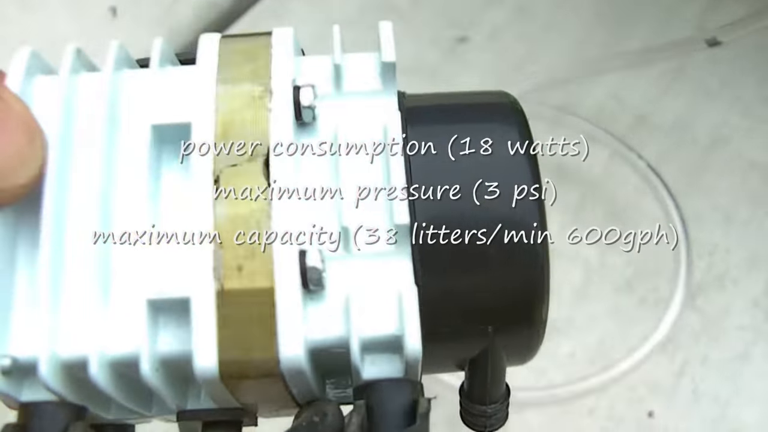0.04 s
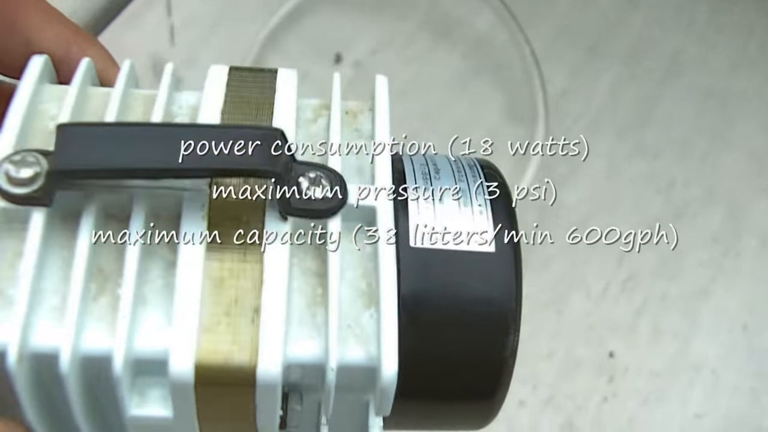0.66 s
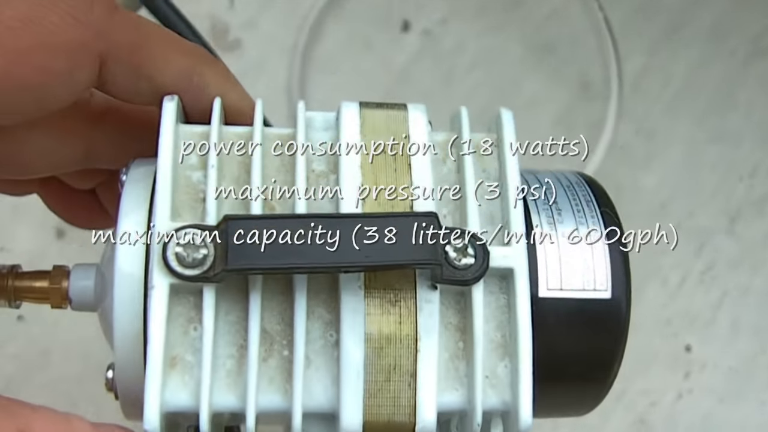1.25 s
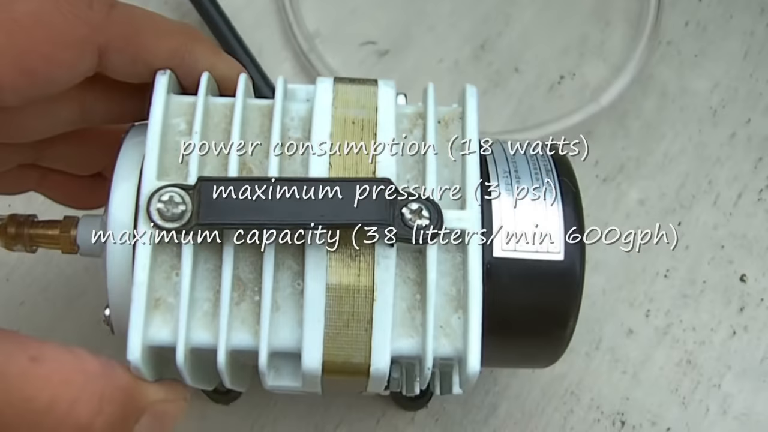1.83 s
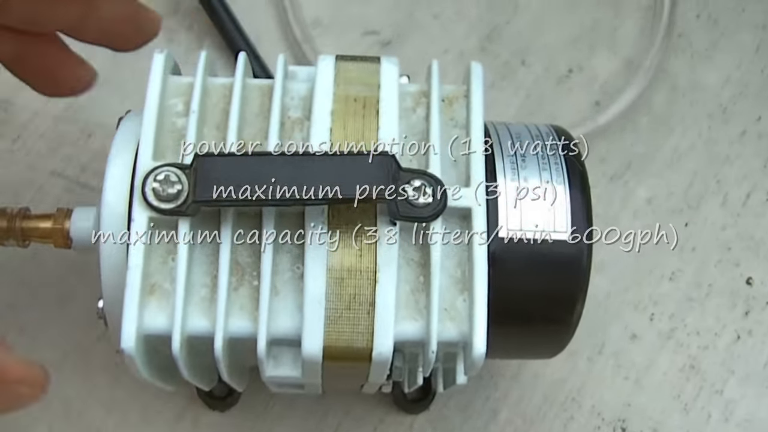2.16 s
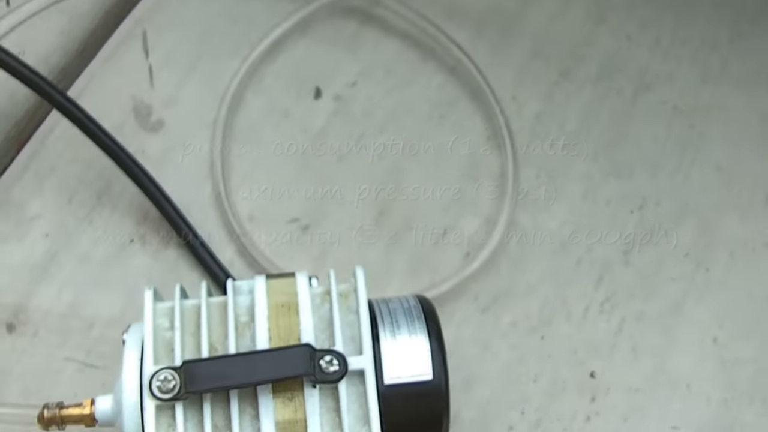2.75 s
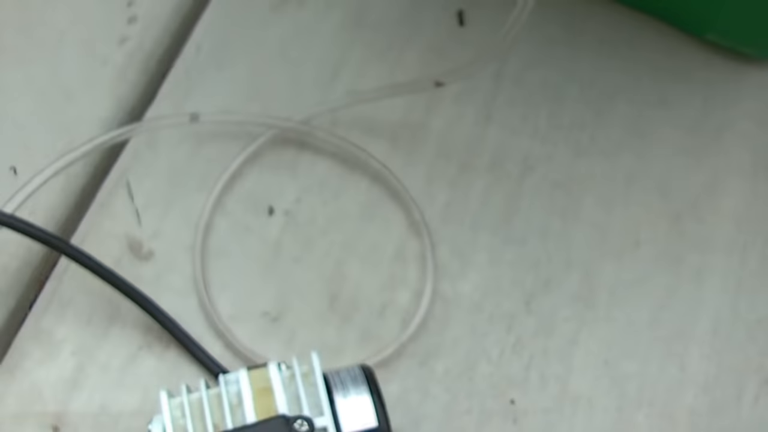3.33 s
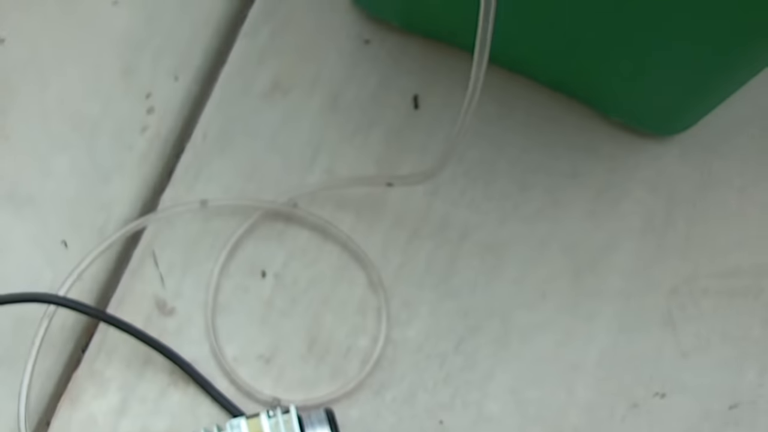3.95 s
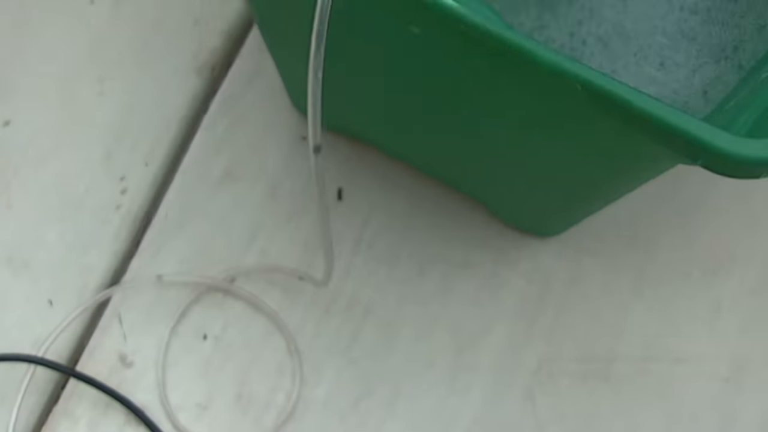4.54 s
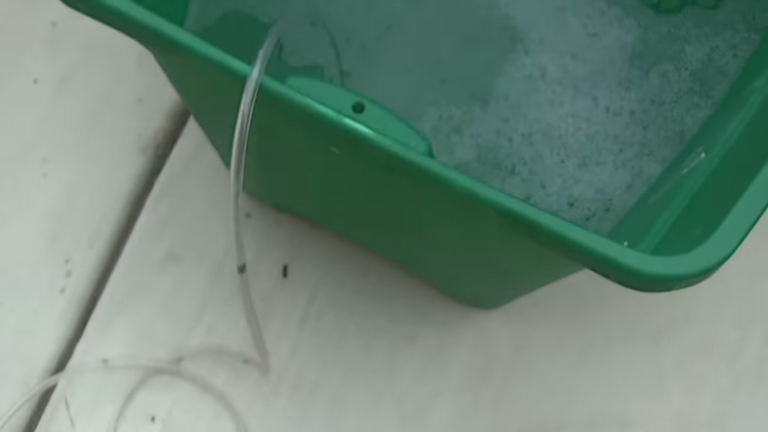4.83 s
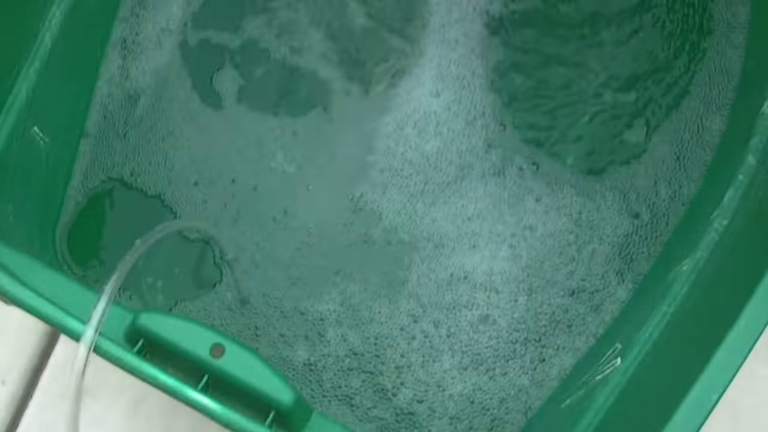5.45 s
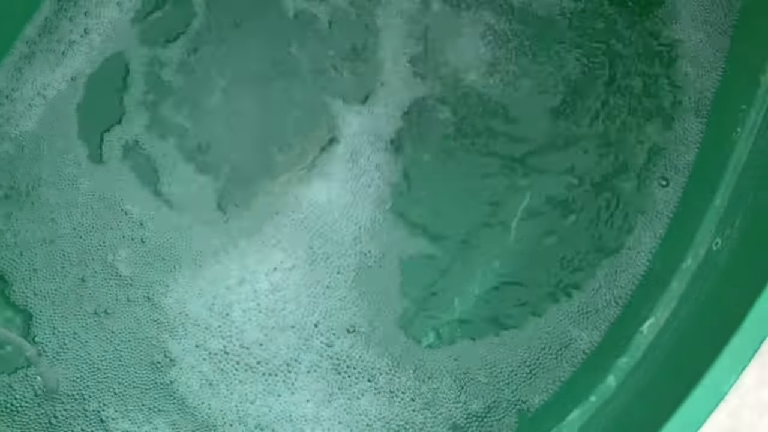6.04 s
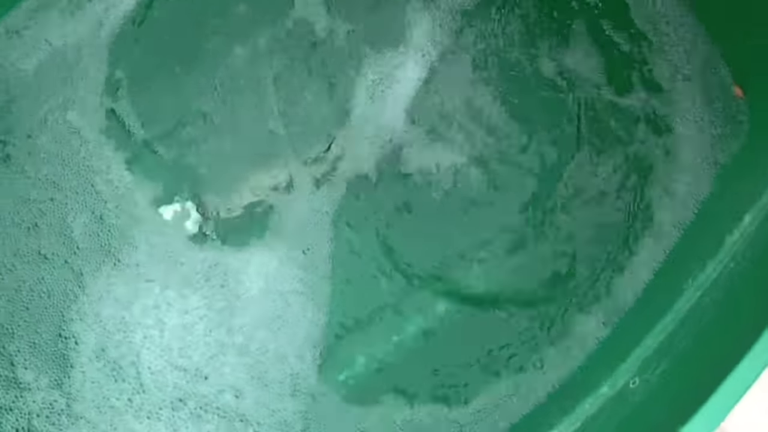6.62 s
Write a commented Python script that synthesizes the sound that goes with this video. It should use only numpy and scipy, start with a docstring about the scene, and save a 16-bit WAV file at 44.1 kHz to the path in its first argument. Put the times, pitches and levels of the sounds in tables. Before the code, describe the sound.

The rapid metallic buzz of a small electric air pump fades into the distance as clicks and scuffs sound on the microphone.

```python
"""First you hear a small air pump buzzing and rattling on a hard floor as it feeds a tub of foaming water.
Its electromagnet shakes it 60 times a second. The piston and valves strike four times in each cycle
and ring the finned casing, and air hisses with each stroke. A hand rolls the pump upright and sets
it down. Then the microphone drifts to the tub and the buzz fades: the grip on the microphone's shell
clicks and scuffs, and the water gives a few small blips."""
import sys
import numpy as np
from scipy import signal
from scipy.fft import rfft, irfft, next_fast_len
from scipy.io import wavfile
from scipy.ndimage import uniform_filter1d

SR = 44100
rng = np.random.default_rng(int(sys.argv[2]) if len(sys.argv) > 2 else 0)


def wav_record(signal):
    """Record a signal, one row per channel, as 16-bit PCM in the file named by sys.argv[1]."""
    frames = np.transpose(np.atleast_2d(signal))
    bounded = np.clip(frames, -1, 1)
    # unit amplitude maps onto the largest positive 16-bit level
    quanta = np.round(bounded * 32767).astype(np.int16)
    wavfile.write(sys.argv[1], SR, quanta)


N = 295029
TIME_S = np.arange(N) / SR
FFT_SIZE = next_fast_len(N + 8192)
FFT_HZ = np.arange(FFT_SIZE // 2 + 1) * SR / FFT_SIZE + 1e-6
MAINS_HZ, SOUND_M_PER_S = 60, 343

# How far the microphone is from the pump: time_s, distance_m
PUMP_DISTANCE = [(0, 0.24), (.8, 0.17), (2, 0.25), (2.6, 0.31), (3.4, 0.56), (4.2, .74), (4.85, 1.12),
                 (6.7, 1.45)]
# Angle between the pump's top and the microphone as the hand rolls it upright: time_s, tilt_degrees
PUMP_TILT = [(0, 57), (.17, 70), (.48, 66), (.75, 51), (1.1, 17), (1.5, 5)]

# Tone colour of each noise, and of the clicking shell: pitch_hz, relative_db
ROOM_COLOUR = [(25, -39), (60, -28), (120, -38), (250, -13), (550, -2), (1000, -1), (2300, -1), (4500, -7),
               (9000, -8), (12000, -11), (15500, -15.5)]
RUMBLE_COLOUR = [(25, -57), (50, -0.5), (95, 0), (200, -3.5), (330, 0), (500, -2), (700, -4), (950, -38),
                 (2000, -60)]
SCUFF_COLOUR = [(300, -45), (750, -7), (1200, 1.5), (1900, 5.5), (3000, -4), (5500, 1.5), (7800, -1),
                (10000, 0.5), (12500, -4.5), (15500, -8)]
AIR_COLOUR = [(700, -41), (1500, -25), (2100, -5.5), (3200, -8.5), (4700, -12), (5600, -12.5),
              (6500, -14.5), (9000, -12.5), (12000, -20), (15500, -29)]
SHELL_COLOUR = [(150, -59), (600, -32), (1300, 6.5), (2200, 7.5), (4000, 0.5), (6000, 1), (8000, 2),
                (11000, -3), (15500, -3)]
# Hiss of the room and foam, which dips and then grows toward the tub: time_s, level_db
HISS_LEVEL = [(0, -56), (3.4, -58.5), (4.3, -57), (6.7, -56.5)]
# Bubbles and hollow knocks: start_s, pitch_hz, fade_by_60_db_s, level_db
BLIPS = [(3.846, 1010, 0.02, -35.5), (3.8548, 330, 0.02, -42), (3.8543, 620, 0.012, -34),
         (4.967, 704, 0.022, -39), (5.024, 757, 0.028, -42), (5.027, 1100, 0.016, -37.5),
         (5.3, 1385, .05, -47)]
# Clicks of the shell in the hand: start_s, level_db, brightest_hz, width_octaves, left_minus_right_db
GRIP_CLICKS = [(3.155, -35, 3500, 1.8, 1), (3.702, -32, 2350, 1.1, 0), (3.758, -26.5, 7500, 1.4, -1),
               (3.844, -42.5, 2420, 0.5, -30), (3.8542, -25.5, 4800, 0.78, -4),
               (4.043, -24.5, 13000, 0.76, -2), (4.34, -36.5, 6000, 1, 0), (4.5881, -31, 3120, 1.24, -11.5),
               (5.728, -25, 9100, 1.6, -6), (5.761, -21.5, 10100, 0.74, -8), (5.774, -24, 10000, 1.3, -1),
               (5.818, -31, 4500, 1.4, -2), (5.843, -28, 4500, 1.2, -3), (5.846, -24, 3770, 0.79, 0),
               (5.886, -15.5, 9600, 1.13, -1), (6.196, -31, 12000, 0.75, -3),
               (6.2045, -17, 6500, 2.2, -0.5), (6.249, -29.5, 8900, 0.75, -1),
               (6.493, -29.5, 8800, 1.05, 2)]
# Swells of hand rumble, dragging skin and loose pump casing: middle_s, half_length_s, level_db
GRIP_RUMBLES = [(1.95, 0.57, -63.5), (3.92, 0.23, -63.5)]
GRIP_SCUFFS = [(3.924, 0.022, -51), (4.626, 0.021, -55), (5.288, 0.02, -55), (5.734, 0.01, -39.5),
               (5.766, 0.013, -38.5), (5.822, 0.032, -44.5), (5.851, 0.0069, -43), (6.646, 0.013, -50)]
CASING_CHATTERS = [(.01, .03, -55), (.72, 0.18, -48.5), (1.999, .003, -44.5), (2.032, .003, -45),
                   (2.049, .003, -46), (2.149, .004, -53), (2.183, .004, -47), (2.199, .004, -54),
                   (3.95, 0.043, -59)]

# Tones in the hum, beside the pump and over the tub: multiple_of_mains, relative_db
HUM_NEAR = [(1, -9.5), (2, -2.5), (3, 0.5), (4, -1.5), (5, -5), (6, -7.5), (7, -9.5), (8, -3), (9, -1.5),
            (10, -3), (11, -6.5), (12, -6), (13, -10), (14, -16)]
HUM_FAR = [(1, -24), (2, 0.5), (3, -11), (4, 0.5), (5, 2.5), (6, 0), (7, -4), (8, -10), (9, -2), (10, -6.5),
           (11, -9.5), (12, -7), (13, -15), (14, -11)]
# Higher hum tones that stand out for a while: multiple_of_mains, middle_s, half_length_s, level_db
HUM_OVERTONES = [(13, 0.1, 0.6, -68), (15, 2.2, 0.6, -67), (16, 0.8, 0.8, -72), (19, 1.9, 1.1, -71),
                 (20, 2.1, 0.4, -72), (24, 2.4, 0.5, -69)]

# The four strikes in a cycle and how hard each pushes four parts of the pump:
# time_in_cycle_s, cap_push_db, body_push_db, plate_push_db, tick_push_db
STRIKES = [(.01502, -1, 0, -7, -6), (.00060, -10, -10, -5, -2), (.00200, -12, -7, -12, -9),
           (.00347, -1, -8, 0, 0)]
# How hard the same four strikes push the loose casing: push_db
CASING_PUSH = [22, -36, -29, -24]
# The notes each part rings at when struck (its resonances): pitch_hz, width_hz, relative_db
CASING_NOTES = [(1930, 540, 1.5), (3330, 220, 10.5), (3800, 190, 12), (7200, 1400, 7)]
END_CAP_NOTES = [(1141, 6, 6), (1324, 74, 6), (1513, 175, 14), (1750, 60, 10.5)]
BODY_LOW_NOTES = [(2004, 246, -1), (2090, 84, -2.5), (2220, 125, 4.5)]
BODY_MID_NOTES = [(2392, 40, 7), (2550, 123, 3), (2687, 140, 5), (2806, 117, 0.5)]
BODY_HIGH_NOTES = [(3120, 360, 13.5), (3360, 110, 9), (3580, 72, 4.5), (3720, 91, -2), (3790, 47, 4.5),
                   (4435, 54, 2)]
FIN_NOTES = [(4020, 110, 2), (4324, 160, 5.5), (4680, 260, -6.5), (5054, 61, 6.5)]
VALVE_PLATE_NOTES = [(5180, 130, 0), (5500, 130, 3), (5590, 110, -4)]
VALVE_SEAT_NOTES = [(6480, 220, -1.1), (6950, 130, -1), (7330, 150, -0.33), (7720, 390, 0.51)]
VALVE_TICK_NOTES = [(8300, 200, -3), (8630, 200, 4), (8915, 510, 0), (9380, 320, 5.5), (9700, 380, -19.5),
                    (10700, 950, -2)]
# How loud each part is as the pump turns and is left behind: time_s, level_db
BODY_LOW_LEVEL = [(0, -51.5), (.3, -52), (.67, -44), (1, -48.5), (1.2, -48), (1.45, -47), (1.62, -48.5),
                  (1.85, -54.5), (2, -50.5), (2.25, -50.5), (2.5, -50.5), (2.8, -51), (3.3, -54.5),
                  (3.7, -58), (4.25, -55), (4.8, -67.5), (5.15, -62), (5.55, -61.5), (6.1, -67), (6.7, -73)]
BODY_MID_LEVEL = [(0, -50.5), (.48, -52), (.83, -43), (1.25, -46), (1.42, -48.5), (1.53, -53), (1.66, -46),
                  (1.9, -48.5), (2.05, -58), (2.3, -55), (2.52, -51.5), (2.8, -53.5), (3.3, -56.5),
                  (3.7, -61), (3.96, -53.5), (4.2, -61.5), (4.55, -57.5), (5.05, -65), (5.5, -61),
                  (6.7, -64.5)]
BODY_HIGH_LEVEL = [(0, -54), (.4, -54), (.83, -49.5), (1.4, -48), (1.85, -49.5), (2.03, -45.5),
                   (2.18, -47.5), (2.33, -52), (2.55, -51.5), (3.05, -56.5), (3.3, -57), (3.6, -59.5),
                   (4.3, -61.5), (5, -63), (6.7, -66.5)]
FIN_LEVEL = [(0, -53), (.14, -61), (.48, -61), (1.08, -55), (1.6, -58), (2.3, -57.5), (2.45, -52.5),
             (3, -59), (4.3, -63.5), (6.7, -69.5)]
VALVE_PLATE_LEVEL = [(0, -49), (.13, -59.5), (.29, -55), (.41, -57), (.64, -47), (.77, -51), (1.05, -46),
                     (1.35, -51), (1.55, -54.5), (1.9, -52.5), (2.05, -57.5), (2.6, -54.5), (2.95, -56),
                     (3.25, -60.5), (3.6, -59), (4.4, -64), (5, -68), (6.7, -67)]
VALVE_SEAT_LEVEL = [(0, -51), (.12, -67), (.45, -56), (.72, -57), (1.1, -53), (1.5, -57.5), (2.02, -54),
                    (2.28, -68), (2.5, -60), (3.6, -62), (4.6, -66.5), (6.7, -67)]
VALVE_TICK_LEVEL = [(0, -56.5), (.45, -55.5), (.75, -57.5), (1.3, -56), (2, -52), (2.3, -52.5),
                    (2.42, -53.5), (3.4, -53), (4.2, -57), (5, -62), (6.7, -64)]
# Which pitch of the body faces the microphone and stands out: time_s, low_hz, middle_hz
FACING_BODY = [(0, 2100, 2860), (.35, 1920, 2750), (.6, 1970, 2470), (.9, 2090, 2600), (1.3, 2010, 2650),
               (1.5, 2130, 2780), (1.75, 2170, 2800), (2.25, 2085, 2450), (2.7, 2070, 2480),
               (4.2, 2050, 2580), (6.7, 2010, 2640)]
# The same for the fins and valves: time_s, fin_hz, plate_hz, seat_hz, tick_hz
FACING_TREBLE = [(0, 4900, 5700, 6400, 9250), (.2, 4020, 5480, 6500, 8700), (.48, 4430, 5520, 6480, 9600),
                 (.72, 4440, 5550, 7040, 8160), (1, 4600, 5600, 7550, 9380), (1.22, 4750, 5800, 7330, 9200),
                 (1.3, 4700, 5230, 7200, 9200), (1.48, 4700, 5200, 7100, 8300),
                 (1.62, 4700, 5400, 7000, 8300), (1.88, 4420, 5220, 7570, 8400),
                 (2.03, 4500, 5500, 6950, 8630), (2.28, 5000, 5480, 7340, 8880),
                 (2.45, 4520, 5440, 7330, 9040), (2.9, 4680, 5460, 7330, 9030),
                 (4.2, 4900, 5460, 7720, 9090), (6.7, 4700, 5500, 7700, 8930)]
# How the end cap ("cap") and the air hiss ("air") carry to the microphone:
# close_level_db, half_power_distance_m, facing_tilt_degrees, facing_boost_db, lying_on_side_db
QUIET_PARTS = {"cap": (-58, 0.23, 59, 3, 1.5), "air": (-52.5, 0.21, 45, 8.5, -3.5)}


def gain(db):
    """Turn decibels into a number to multiply a sound by."""
    return 10 ** (np.asarray(db) / 20)


def unit_level(sound):
    """Scale a sound so that its average power is 1."""
    return sound / np.sqrt(np.mean(sound ** 2))


def curves(table):
    """Join the rows of a table with straight lines through time, one curve for each value column."""
    times_s, *columns = np.transpose(table)
    return [np.interp(TIME_S, times_s, column) for column in columns]


def fader(table):
    """Turn a table of levels into a gain that moves through time."""
    return gain(curves(table)[0])


def swells(table):
    """A gain that rises and falls in a bell shape for each row."""
    return sum(gain(db) * np.exp(-((TIME_S - middle_s) / half_s) ** 2 / 2)
               for middle_s, half_s, db in table)


def wander(rate_hz):
    """A smooth random curve that strays about 1 either side of zero."""
    step = int(SR / rate_hz)
    return 1.53 * uniform_filter1d(np.repeat(rng.standard_normal(N // step + 1), step), step)[:N]


def colour_gain(colour, hz):
    """Read a tone colour table as a gain at each of the given pitches."""
    points_hz, db = np.transpose(colour)
    return gain(np.interp(np.log(hz), np.log(points_hz), db))


def filtered(sound, gains):
    """Turn each pitch in a sound up or down by its own gain."""
    return irfft(rfft(sound, FFT_SIZE) * gains, FFT_SIZE)[..., :N]


def stereo_noise(colour, strength=1, apart_hz=4200):
    """Coloured noise: left and right are alike in the bass and nearly unrelated above apart_hz."""
    middle, side = filtered(strength * rng.standard_normal((2, N)), colour_gain(colour, FFT_HZ))
    side = filtered(side, np.clip(np.hypot(0.17, FFT_HZ / apart_hz), 0, .85))
    return (middle + side * np.array([[1], [-1]])) / np.std(middle)


def distance_gain(distance_m, reach_m):
    """Sound stays level close to its source, then falls as 1 / distance beyond its reach."""
    return 1 / np.hypot(1, distance_m / reach_m)


def quiet_part_gain(name, distance_m, beam_degrees=22):
    """A part is weaker far away, louder facing the microphone, and changes as the pump lies down."""
    close_db, reach_m, facing_degrees, boost_db, on_side_db = QUIET_PARTS[name]
    tilt, = curves(PUMP_TILT)
    facing = np.exp(-((tilt - facing_degrees) / beam_degrees) ** 2)
    on_side = np.sin(np.radians(tilt)) ** 2
    return gain(close_db + boost_db * facing + on_side_db * on_side) * distance_gain(distance_m, reach_m)


def strike_pulses(pushes_db, scatter_db=.7, jitter_s=.000002):
    """One pulse for each strike of each cycle; strength and timing vary a little."""
    starts_s = np.arange(int(N / SR * MAINS_HZ))[:, None] / MAINS_HZ + np.array(STRIKES)[:, 0]
    position = np.clip((starts_s + jitter_s * rng.standard_normal(starts_s.shape)) * SR, 0, N - 2).ravel()
    push = gain(pushes_db + scatter_db * rng.standard_normal(starts_s.shape)).ravel()
    # a pulse that falls between two samples is shared by both
    sample, fraction = position.astype(int), position % 1
    return np.bincount(sample, push * (1 - fraction), N) + np.bincount(sample + 1, push * fraction, N)


def ring(notes, pulses, limit_hz=1000):
    """A struck part rings, one row per note; a second band, limit_hz wide, softens each start."""
    def band(sound, hz, width_hz):
        return signal.lfilter(*signal.iirpeak(hz, hz / width_hz, fs=SR), sound)
    return np.array([gain(db) * band(band(pulses, hz, width_hz), hz, limit_hz)
                     for hz, width_hz, db in notes])


def ring_facing(notes, pulses, facing_hz, beam_octaves=.05, boost_db=12):
    """Ring a part so that the note facing the microphone stands out while the total power holds steady."""
    rings = ring(notes, pulses, limit_hz=700)
    octaves_away = np.log2(np.array(notes)[:, :1]) - np.log2(facing_hz)
    weight = 1 + (gain(boost_db) - 1) * np.exp(-(octaves_away / beam_octaves) ** 2)
    power = np.sum(weight * (np.cov(rings) @ weight), axis=0)
    return unit_level(np.sum(weight * rings, axis=0) / np.sqrt(power))


def through_room(sound, distance_m, floor_db=-10, left_right_s=.00007, echoes=9):
    """Direct sound plus floor and wall echoes; their delays slide with distance, shifting the colour."""
    fine = signal.resample_poly(sound, 3, 1)  # extra samples keep sliding delays clean
    fine_s = np.arange(len(fine)) * (N / SR / len(fine))

    def delayed(delay_s, side):
        return np.array([np.interp(TIME_S - delay_s - left_right_s * offset, fine_s, fine)
                         for offset in (side, -side)])
    flight_s = distance_m / SOUND_M_PER_S
    bounce_s = .00085 - .0001 * np.sin(np.radians(curves(PUMP_TILT)[0]))  # shifts as the pump rolls
    heard = delayed(flight_s, .2) + gain(floor_db) * delayed(flight_s + bounce_s, -.6)
    echo_gain = (0.14 + 0.15 * distance_m) / np.sqrt(echoes)
    for k in range(echoes):
        direction = k * np.pi * (3 - np.sqrt(5))  # spreads the echoes evenly all round
        delay_s = .0025 + .02 * (k / echoes) ** 2 + np.cos(direction) * flight_s
        heard += echo_gain * delayed(delay_s, np.sin(direction))
    return heard / np.sqrt(1 + gain(floor_db) ** 2 + echoes * echo_gain ** 2)


def room_and_foam_hiss():
    """The room and the foaming water make a soft hiss that wavers very slightly."""
    return stereo_noise(ROOM_COLOUR) * fader(HISS_LEVEL) * gain(0.15 * wander(8.3))


def low_rumble(distance_m, room_db=-70.5, pump_db=-61.5):
    """An unsteady rumble from the room, the air close to the pump and the hand shifting its grip."""
    pump = gain(pump_db) * distance_gain(distance_m, reach_m=0.2)
    level = np.sqrt(gain(room_db) ** 2 + pump ** 2 + swells(GRIP_RUMBLES) ** 2)
    return stereo_noise(RUMBLE_COLOUR) * level * gain(1.8 * np.tanh(wander(12)))


def blips(glide_per_s=2.9, rise_s=0.0011):
    """Bubbles and hollow knocks: short tones that rise a little in pitch as they die away."""
    sound = np.zeros(N)
    t = TIME_S[:SR // 10]
    for start_s, hz, fade_s, db in BLIPS:
        level = gain(db - 60 * t / fade_s) * (1 - np.exp(-t / rise_s))
        start = int(start_s * SR)
        sound[start:start + len(t)] += level * np.sin(2 * np.pi * hz * t * (1 + glide_per_s * t))
    return sound


def grip_scuffs(grain_db=4.5):
    """Skin drags over plastic in a crowd of tiny slips that swells and fades."""
    slip_sizes = np.repeat(rng.exponential(size=N // 16 + 1), 16)[:N]
    slips = gain(grain_db * np.minimum(slip_sizes, 4))
    return swells(GRIP_SCUFFS) * stereo_noise(SCUFF_COLOUR, slips, apart_hz=6800)


def grip_clicks(ring_s=0.00096, ring_db=-17, tail_s=0.02, tail_db=-33, boost_db=2, size=4096):
    """The gripped shell snaps, rings for about a millisecond and leaves a faint tail in the room."""
    sound, t = np.zeros((2, N + size)), TIME_S[:size]
    hz = np.maximum(np.arange(size // 2 + 1) * SR / size, 1)
    fade = gain(ring_db) * np.exp(-t / ring_s) + gain(tail_db) * np.exp(-t / tail_s)
    for start_s, db, brightest_hz, octaves, pan_db in GRIP_CLICKS:
        colour = colour_gain(SHELL_COLOUR, hz) / (1 + (np.log2(hz / brightest_hz) / octaves) ** 2)
        # build a filter of this colour that rings only after the snap (minimum phase)
        one_sided = irfft(np.log(colour))[:size // 2] * np.r_[1, np.full(size // 2 - 1, 2)]
        shell = np.exp(rfft(one_sided, size))
        noise = 0.8 * rng.standard_normal(size) + 1.15 * rng.standard_normal((2, size))
        snap = (t == 0) + noise * fade
        click = irfft(rfft(snap) * shell)
        level = gain(db + boost_db + np.array([[pan_db], [-pan_db]]) / 2)
        start = int(start_s * SR)
        sound[:, start:start + size] += click / np.abs(click).max() * level
    return sound[:, :N]


def air_hiss(distance_m):
    """A puff of air hisses through the pump on every stroke."""
    cycles = MAINS_HZ * (TIME_S - distance_m / SOUND_M_PER_S)
    puffs = np.exp(1.2 * np.cos(2 * np.pi * (cycles - .06)))
    return stereo_noise(AIR_COLOUR, puffs) * quiet_part_gain("air", distance_m)


def hum_overtones():
    """Single high tones of the hum swell and fade as the microphone moves through the room."""
    sound = np.zeros(N)
    for multiple, *swell in HUM_OVERTONES:
        cycles = round(multiple) * MAINS_HZ * TIME_S + rng.random()
        sound += swells([swell]) * np.sqrt(2) * np.sin(2 * np.pi * cycles)
    return sound


def pump_hum(distance_m, near_db=-57.5, far_db=-61, blend_from_m=0.39, blend_to_m=0.92):
    """The shaking body hums; standing waves in the room give the hum another mix of tones by the tub."""
    multiples = np.array(HUM_NEAR)[:, :1].round()
    phases = rng.random(multiples.shape)

    def hum_at(table, away_m):
        one_cycle_s = TIME_S[:SR // MAINS_HZ] - away_m / SOUND_M_PER_S
        tones = np.sin(2 * np.pi * (multiples * MAINS_HZ * one_cycle_s + phases))
        one_cycle = unit_level(gain(np.array(table)[:, 1]) @ tones)
        return np.resize(one_cycle, N)  # repeat it to the end
    near = gain(near_db) * hum_at(HUM_NEAR, away_m=0)
    far = gain(far_db) * hum_at(HUM_FAR, away_m=1.424)
    blend = np.clip((distance_m - blend_from_m) / (blend_to_m - blend_from_m), 0, 1)
    return ((1 - blend) * near + blend * far) * gain([[-.3], [.3]])  # a touch louder on the right


def casing_chatter():
    """The loose casing chatters as the pump is turned and knocks a few times as it is set down."""
    pulses = strike_pulses(np.array(CASING_PUSH), scatter_db=1.5, jitter_s=.000006)
    return unit_level(ring(CASING_NOTES, pulses).sum(axis=0)) * swells(CASING_CHATTERS)


def fin_and_valve_ring(on_plate, on_ticks):
    """The strikes ring the fins and the valve parts, giving the buzz its bright top."""
    fin_hz, plate_hz, seat_hz, tick_hz = curves(FACING_TREBLE)
    fins = ring_facing(FIN_NOTES, on_plate, fin_hz) * fader(FIN_LEVEL)
    plate = ring_facing(VALVE_PLATE_NOTES, on_plate, plate_hz) * fader(VALVE_PLATE_LEVEL)
    seat = ring_facing(VALVE_SEAT_NOTES, on_ticks, seat_hz) * fader(VALVE_SEAT_LEVEL)
    ticks = ring_facing(VALVE_TICK_NOTES, on_ticks, tick_hz) * fader(VALVE_TICK_LEVEL)
    return fins + plate + seat + ticks


def body_ring(pulses, beam_octaves=0.061):
    """The strikes ring the pump's body in three groups of notes: low, middle and high."""
    low_hz, middle_hz = curves(FACING_BODY)
    low = ring_facing(BODY_LOW_NOTES, pulses, low_hz, beam_octaves) * fader(BODY_LOW_LEVEL)
    middle = ring_facing(BODY_MID_NOTES, pulses, middle_hz, beam_octaves) * fader(BODY_MID_LEVEL)
    high = unit_level(ring(BODY_HIGH_NOTES, pulses).sum(axis=0)) * fader(BODY_HIGH_LEVEL)
    return low + middle + high


def pump_rattle(distance_m):
    """The piston and valves hammer the pump's parts, and the ringing crosses the room."""
    on_cap, on_body, on_plate, on_ticks = (strike_pulses(db) for db in np.array(STRIKES)[:, 1:].T)
    end_cap = unit_level(ring(END_CAP_NOTES, on_cap).sum(axis=0)) * quiet_part_gain("cap", distance_m)
    ringing = body_ring(on_body) + end_cap + fin_and_valve_ring(on_plate, on_ticks) + casing_chatter()
    heard = through_room(ringing, distance_m)
    # the valve ticks are louder on the right than on the left
    tick_band = signal.lfilter(*signal.iirpeak(8800, 2, fs=SR), heard)
    return heard + np.array([[-.38], [.25]]) * tick_band


def scene():
    """Add the pump, the hand, the water and the room together."""
    distance_m, = curves(PUMP_DISTANCE)
    pump = pump_rattle(distance_m) + air_hiss(distance_m) + pump_hum(distance_m) + hum_overtones()
    return pump + grip_clicks() + grip_scuffs() + blips() + room_and_foam_hiss() + low_rumble(distance_m)


def record(dry):
    """The microphone loses one narrow slice of the treble and cuts off the very top steeply."""
    notch_hz, top_hz = 7920, 15600
    notched = signal.lfilter(*signal.iirnotch(notch_hz, 80, fs=SR), dry)
    return signal.sosfilt(signal.ellip(8, .2, 70, top_hz, fs=SR, output="sos"), notched)


dry = scene()
out = record(dry)
wav_record(out)
```